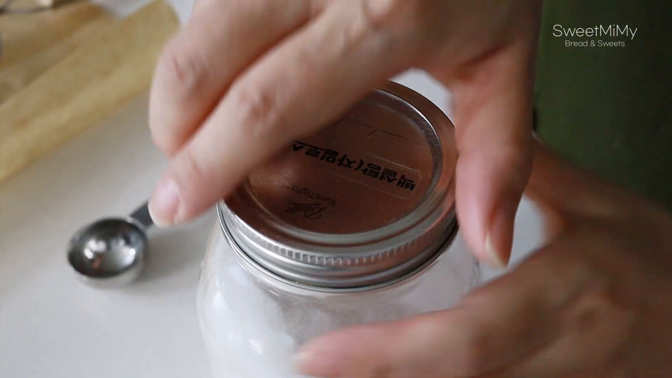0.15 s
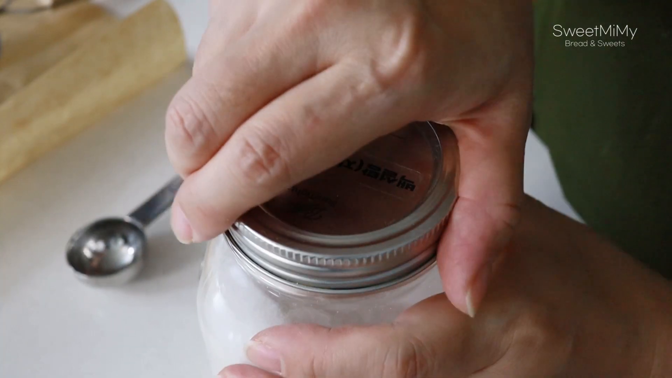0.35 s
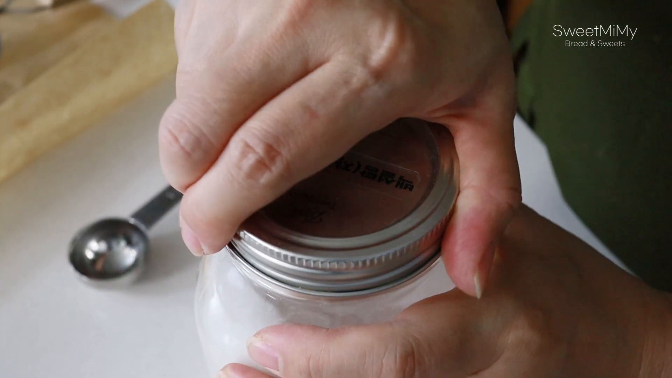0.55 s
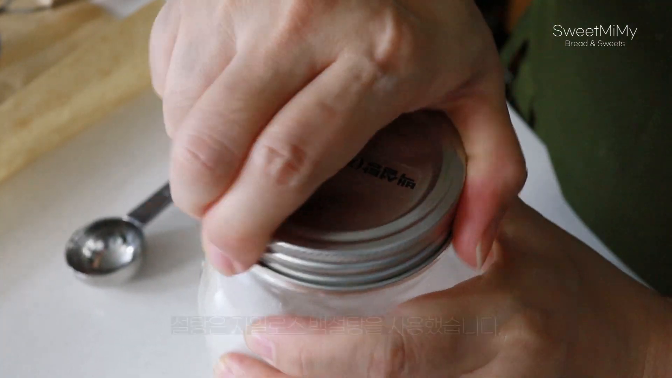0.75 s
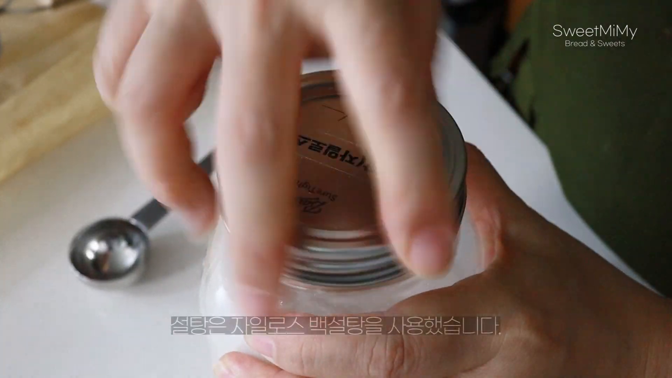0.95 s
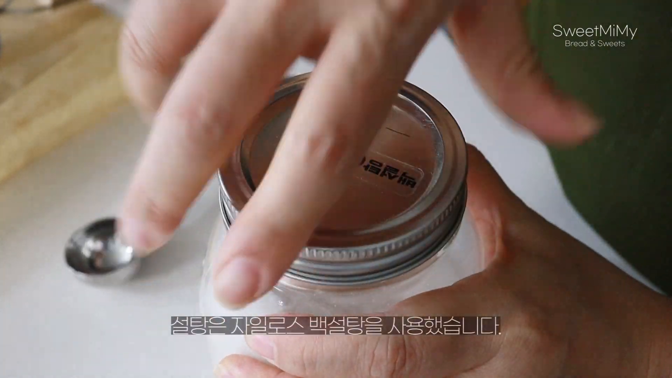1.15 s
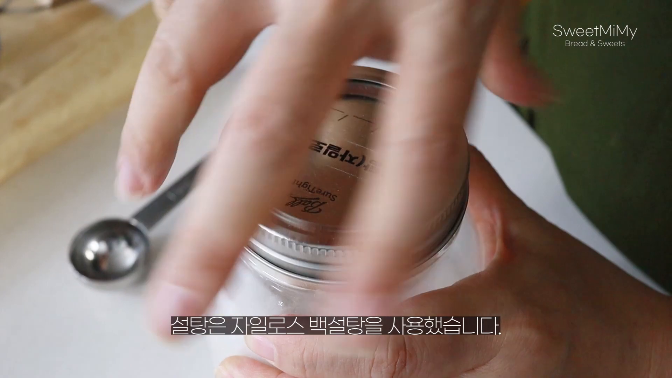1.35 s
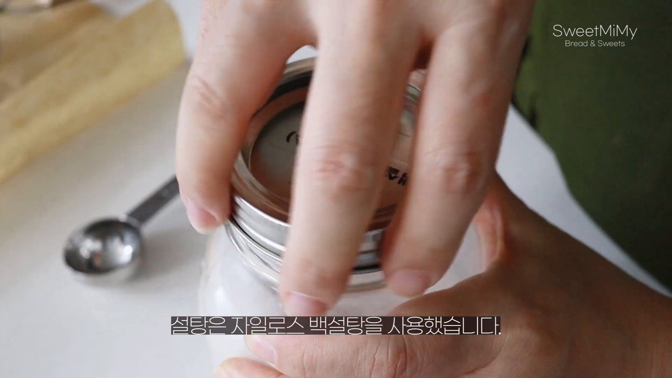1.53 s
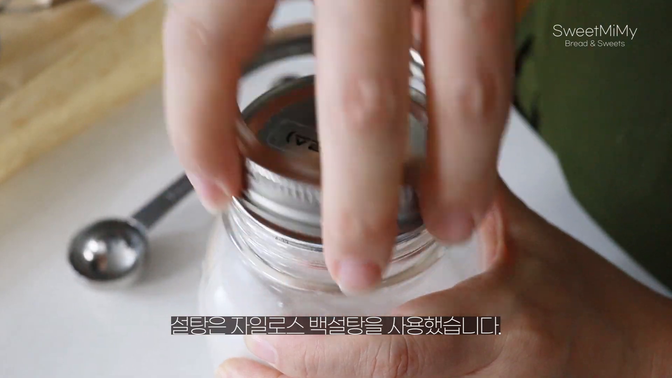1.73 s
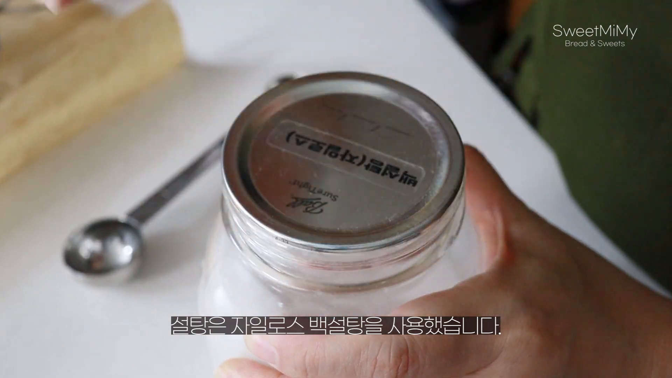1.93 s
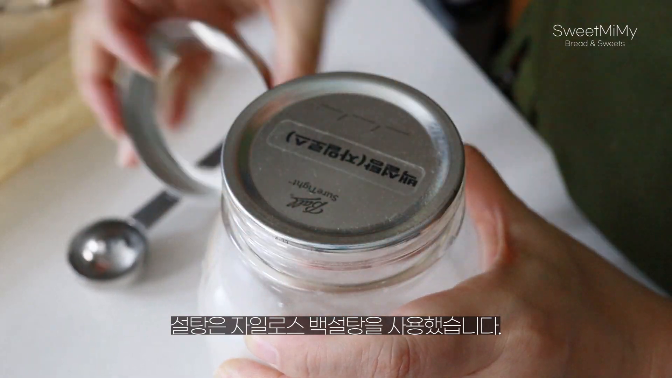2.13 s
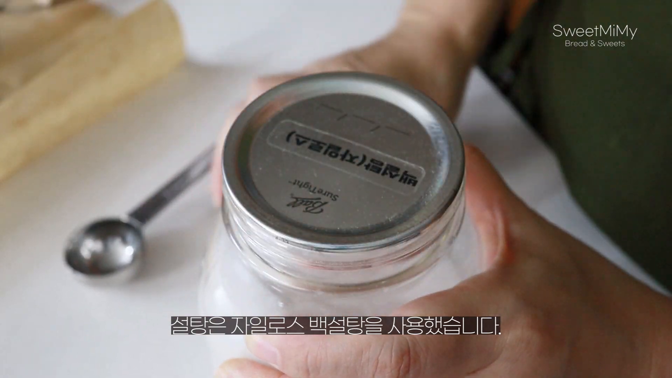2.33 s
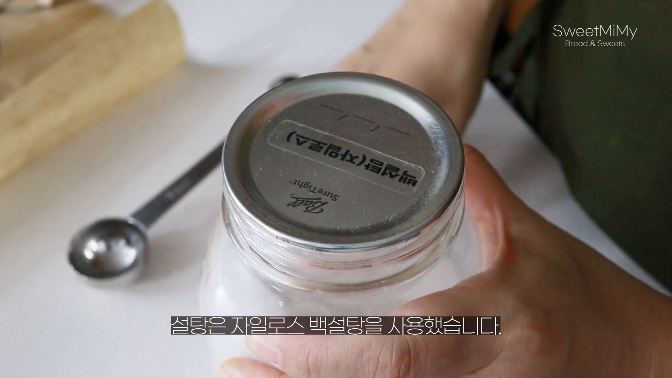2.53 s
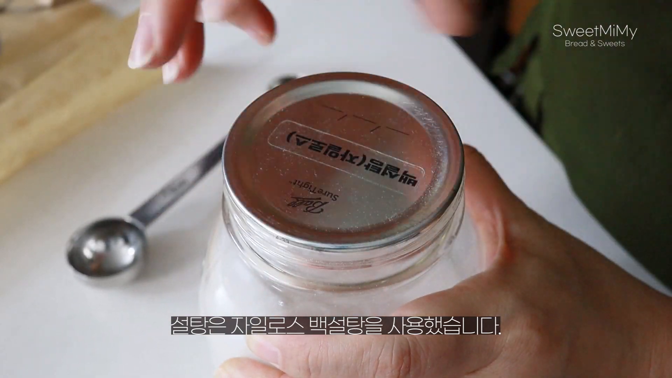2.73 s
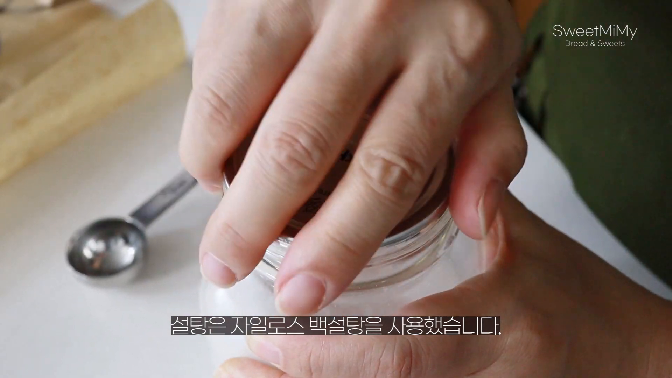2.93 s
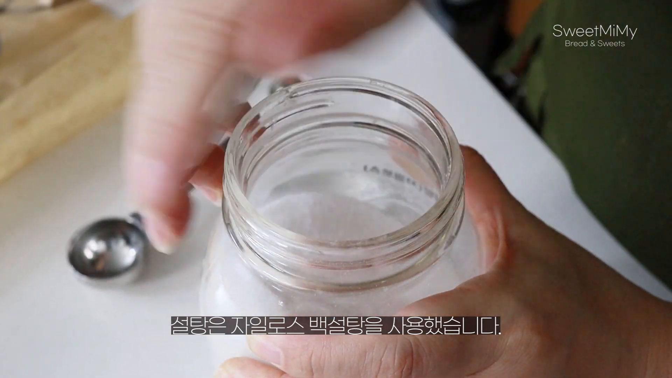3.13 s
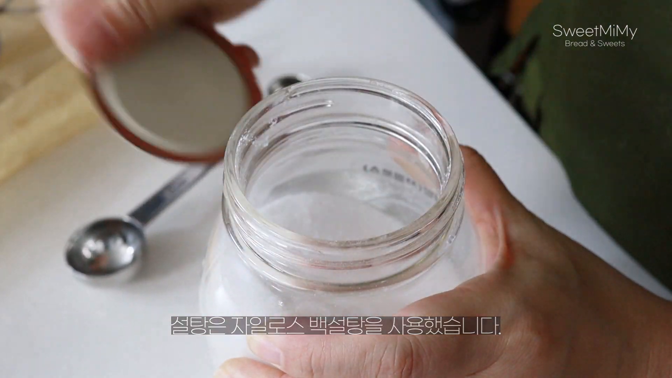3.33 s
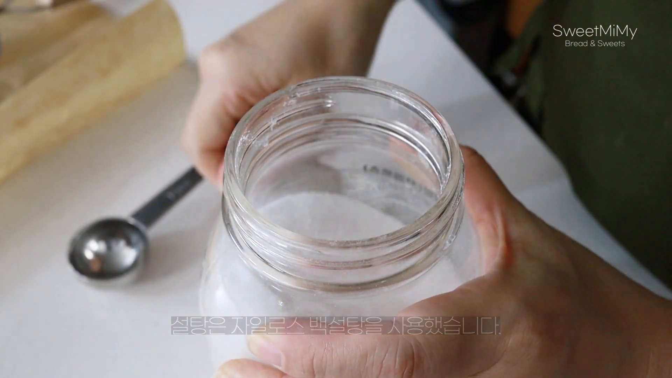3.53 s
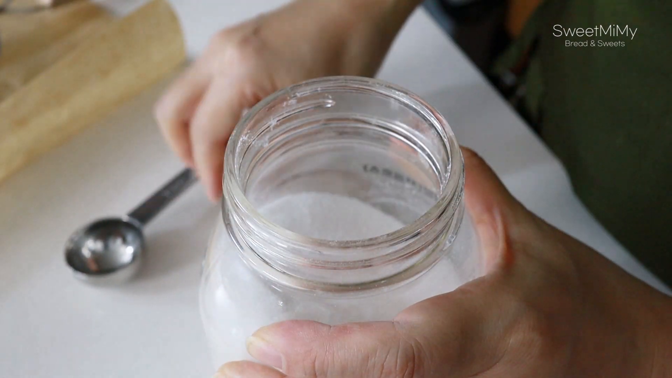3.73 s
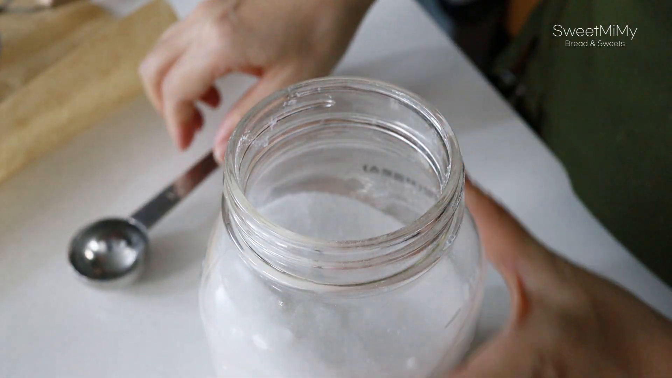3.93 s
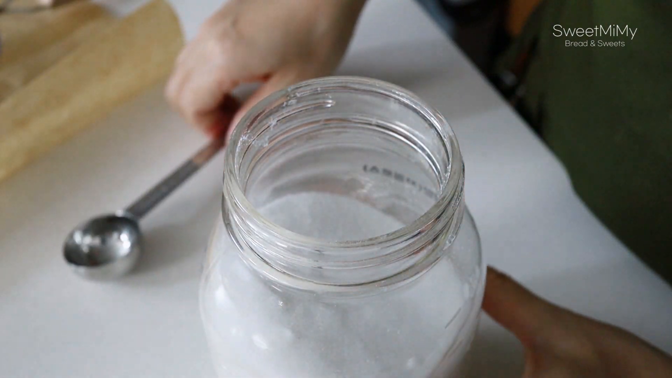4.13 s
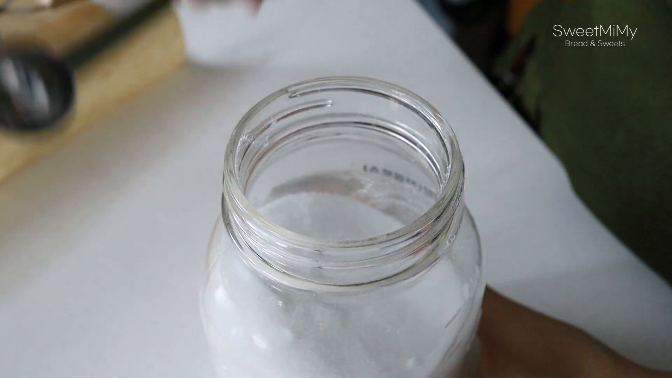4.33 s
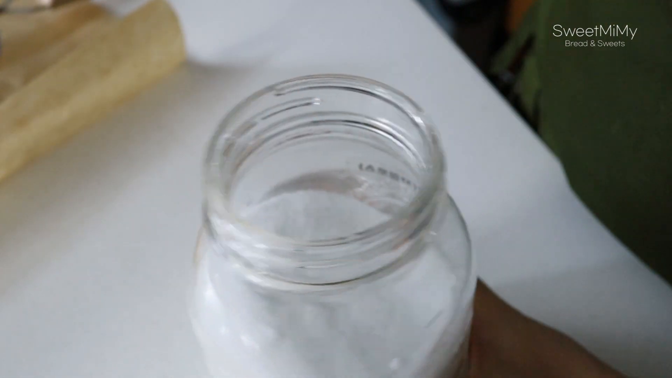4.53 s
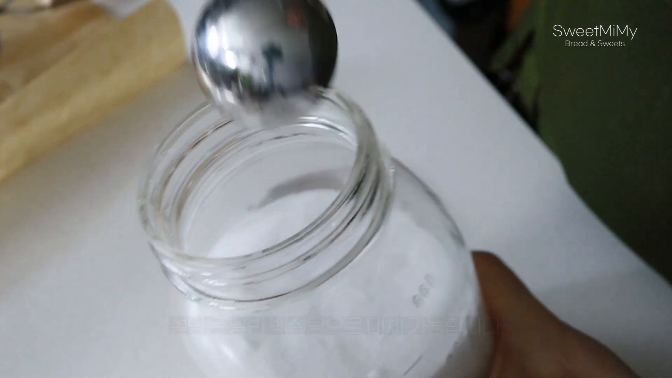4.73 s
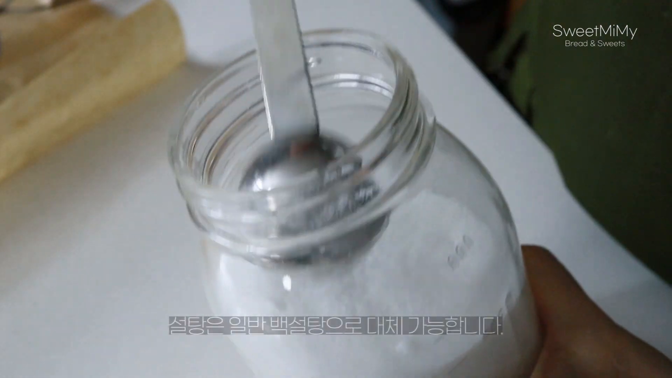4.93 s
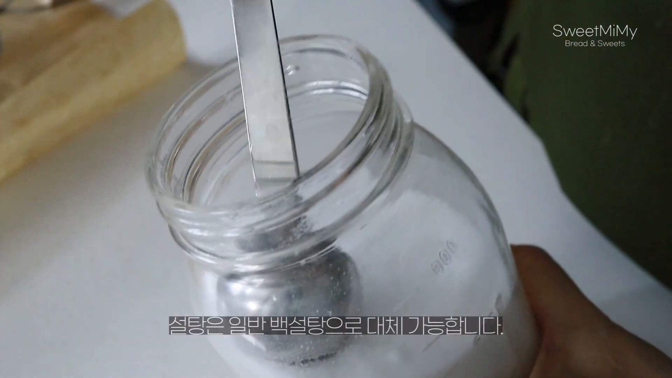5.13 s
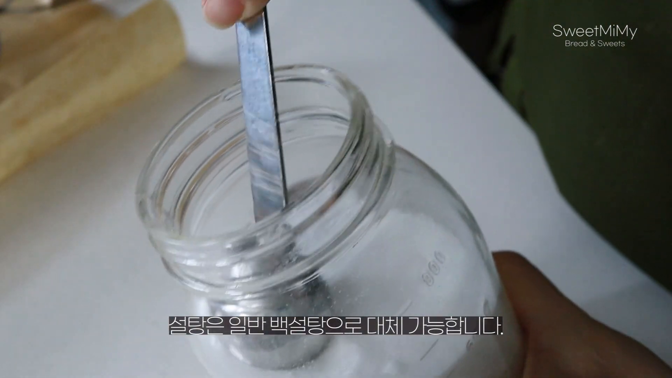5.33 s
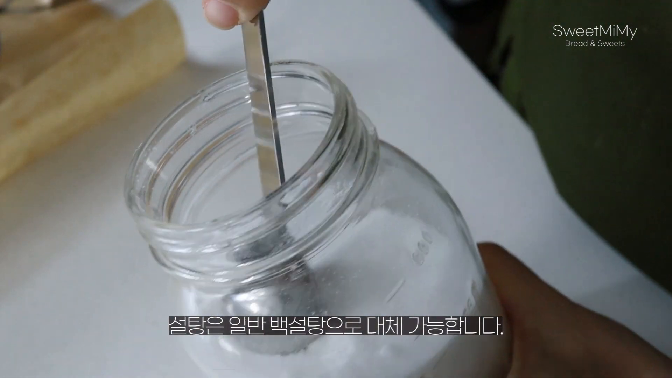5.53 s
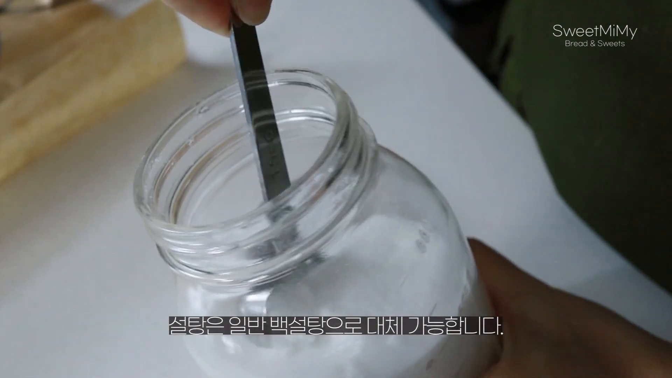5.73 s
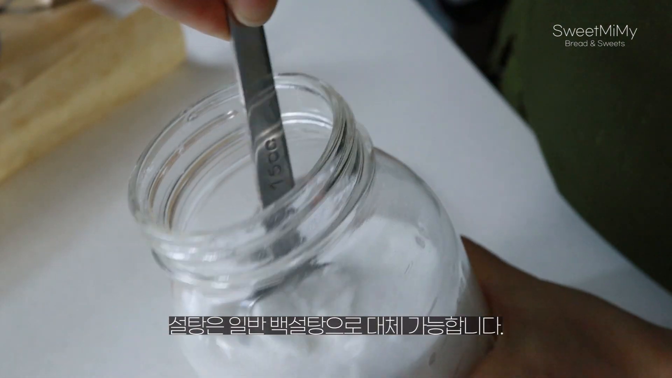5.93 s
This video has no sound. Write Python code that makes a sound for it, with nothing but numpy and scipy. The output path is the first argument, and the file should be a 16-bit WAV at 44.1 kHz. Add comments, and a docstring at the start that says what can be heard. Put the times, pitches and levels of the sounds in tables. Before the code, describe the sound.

A metal screw band scrapes and catches off a glass jar, rattles onto the table, the lid clatters after, then a spoon clinks and crunches into sugar.

```python
"""A hand grips a glass jar and twists off its metal screw band: pings, scraping and hollow grinding from noise.
The band drops on the table and rattles to rest; then the flat lid comes off and clatters down in the same way.
A steel spoon slides and chatters off the table, and the jar is dragged: ringing modes and grains of friction.
Last, the spoon clinks on the glass, digs crunching into sugar that also squeaks, and knocks on the damped glass.
All is close by in a small kitchen with faint air noise, and the hardest blows overload the microphone."""
import sys
import numpy as np
from scipy import signal
from scipy.fft import rfft, irfft
from scipy.io import wavfile
from scipy.ndimage import uniform_filter1d

SR = 44100
rng = np.random.default_rng(int(sys.argv[2]) if len(sys.argv) > 2 else 0)


def file_out(sig):
    """Save sig as 16-bit WAV at sys.argv[1]."""
    # one column per channel
    cols = np.atleast_2d(sig).T
    # limit, then scale
    lim = np.clip(cols, -1, 1)
    pcm = np.round(lim * 32767).astype(np.int16)
    wavfile.write(sys.argv[1], SR, pcm)


N = 267898
TIME = np.arange(N) / SR

# All levels are relative: each source also has mixing gains of its own.
# Strokes of the hand swell to a peak and die away; rise and fall each span 20 dB.
# Turns of the band on the thread:
# (peak time [s], rise [s], fall [s], scrape level [dB], hollow grinding level [dB])
TURNS = [(0.83, 0.011, 0.08, -22.5, -24.5), (0.97, 0.15, 0.099, -33, -38),
         (1.052, 0.046, 0.04, -14.5, -35.5), (1.11, 0.042, 0.082, -22.5, -20),
         (1.366, 0.04, 0.047, -11.5, -29.5), (1.44, 0.023, 0.024, -18, -56),
         (1.6, 0.062, 0.054, -28, -36.5), (1.77, 0.033, 0.043, -49.5, -44.5)]
# Pushes of the spoon into the sugar:
# (peak time [s], rise [s], fall [s], crunch level [dB], fizz of cracking crystals [dB])
DIGS = [(5.08, 0.031, 0.18, -31, -73), (5.27, 0.089, 0.1, -33, -47), (5.335, 0.046, 0.037, -27, -35.5),
        (5.42, 0.055, 0.36, -28, -40), (5.597, 0.028, 0.083, -19, -30), (5.69, 0.1, 0.21, -23, -36.5),
        (6.068, 0.021, 0.14, -28, -28)]
# The lid slipping over the rim of the jar: (peak time [s], rise [s], fall [s], rub level [dB], fizz level [dB])
LID_SLIDES = [(2.99, 0.025, 0.041, -38.5, -63.5), (3.272, 0.032, 0.056, -28.5, -45),
              (3.39, 0.24, 0.12, -43.5, -45)]
# Squeals, slides, scuffs, drags, squeaks and grips: (peak time [s], rise [s], fall [s], level [dB])
THREAD_SQUEALS = [(1.33, 0.016, 0.027, -13)]
BAND_SLIDES = [(2.43, 0.028, 0.14, -26.5)]
LID_SCUFFS = [(3.13, 0.034, 0.06, -42), (3.22, 0.035, 0.056, -33.5)]
SPOON_SLIDES = [(4.232, 0.029, 0.096, -34.5)]
JAR_DRAGS = [(4.5, 0.031, 0.086, -37.5), (4.68, 0.06, 0.073, -20)]
SQUEAKS = [(5.804, 0.043, 0.041, -17), (5.95, 0.025, 0.074, -33)]
GRIPS = [(0.53, 0.044, 0.13, -21.5), (0.85, 0.062, 0.11, -19.5), (1.72, 0.099, 0.11, -29.5),
         (3.03, 0.089, 0.3, -35), (5.95, 0.18, 0.2, -24.5)]
# The sliding spoon falls in pitch: (time [s], pitch [Hz])
SPOON_GLIDE = [(4.21, 1630), (4.24, 1080)]
# Wobble of a dropped disc as it settles: (time [s], level [dB])
BAND_WOBBLE = [(2.625, -23.5), (2.721, -18.5), (2.832, -31.5), (2.863, -72)]
LID_WOBBLE = [(3.684, -15.5), (3.749, -17), (3.88, -24), (3.913, -13.5), (4.0, -25.5), (4.1, -51.5)]
# Single blows: (time [s], level [dB])
THREAD_CATCHES = [(0.647, -36.5), (0.769, -38), (0.811, -19.5), (1.025, -6.5), (1.061, 3), (1.096, -3.5),
                  (1.306, -22), (1.372, 1.5), (1.416, -6.5), (1.426, -1), (1.598, -11.5)]
BAND_PINGS = [(0.677, -25.5), (0.696, -21)]
BAND_LANDING = [(2.4054, 6), (2.526, -22.5), (2.597, -27)]
BAND_BOUNCES = [(2.62, 0), (2.634, 0), (2.657, -5), (2.685, -2.5), (2.704, -13.5)]
LID_RELEASE = [(3.2048, -0.91)]
SPOON_TAPS = [(4.245, -17), (4.276, -14), (4.284, -10), (4.298, -15)]
SPOON_CLINK = [(5.0543, 11.5)]
SPOON_KNOCKS = [(5.449, 0.5), (5.8293, 1.5), (5.9035, -8.5)]
# The lid lands on a different part of its rim each time: (time [s], level [dB], pitch of the clack [Hz])
LID_BOUNCES = [(3.68, -4, 2450), (3.703, -6.5, 3410), (3.737, -3.5, 2310), (3.815, -3.5, 3900),
               (3.844, -8, 1870), (3.875, -7.5, 1710), (3.897, -16.5, 3350)]
# Dull bumps of hands and jar, carried by the table: (time [s], level [dB], pitch [Hz])
BUMPS = [(0.514, -15, 165), (0.855, -11, 156), (1.061, -2.5, 503), (1.097, -10, 505), (1.303, -19.5, 347),
         (1.367, -10.5, 313), (1.635, -23, 328.4), (2.986, -29.5, 313), (3.113, -33, 395),
         (3.205, -24.5, 187), (5.8283, -1, 220), (5.88, -10, 153)]

# Modes (natural ringing tones) of the loose metal parts: (pitch [Hz], level [dB])
BAND_MODES = [(587, -11), (2433, -10), (3682, -3), (3924, -3), (4980, -6), (7294, -5), (8802, -5),
              (9927, -6), (10105, -5), (10702, -8), (11371, -2)]
LID_MODES = [(956, -1.5), (3368, -1), (3672, -6), (5604, -7), (6226, -6), (9450, -9), (10050, -4),
             (11320, -11)]
# The one tone of each disc that rings on once it rolls:
# (pitch [Hz], level [dB], time to fall 60 dB [s], start of rolling [s])
BAND_RIM = (3327, -22, .3, 2.68)
LID_RIM = (1812, -14, .33, 3.84)
# Modes of held or damped things: (pitch [Hz], level [dB], time to fall 60 dB [s])
BAND_ON_JAR = [(781, -11, .2), (3321, -1, .08), (3770, -2, .09), (4800, -5, .06)]
BAND_HELD = [(1134, 1.1, 0.12), (3740, 5.7, 0.12), (5130, 2, 0.0085)]
LID_HELD = [(660, 13.4, 0.044), (2066, 3.7, 0.028), (5090, 17.8, 0.013)]
# The bowl of the spoon has a close pair of modes that beat slowly.
SPOON_MODES = [(1082, 11, .037), (2385, -29, .7), (3320, 6, .025), (2387.5, -29, .7), (4085, -20, .3)]
GLASS_MODES = [(2385, -42, .35), (3079, -26, .15), (3110, 0, .026), (5400, -7, .022)]
GLASS_IN_SUGAR = [(716, -4.5, 0.039), (1078, -6, 0.036), (2040, 16, 0.0028)]
# Broad resonances under rubbing: (pitch [Hz], width [Hz], level [dB])
THREAD_PEAKS = [(3460, 520, 4.5), (5510, 310, 9.5)]
SQUEAL_PEAK = [(3147, 600, 0)]
JAR_AIR = [(350, 170, 0), (570, 240, 1.5), (850, 220, 1)]
JAR_SHUT = [(1080, 150, 0)]
LID_PEAKS = [(5250, 320, 0.0016), (5760, 700, 0.0037)]
SUGAR_PEAKS = [(1140, 61, -6), (3410, 200, 5)]
TABLE_PEAKS = [(212, 53, -0.5), (790, 4800, 6)]
# Colours of noise, points along a spectrum: (frequency [Hz], level [dB])
THREAD_NOISE = [(300, -7), (1450, -13.5), (2900, 2), (5800, 0.5), (7500, -10), (11000, -7.5),
                (15900, -21.5)]
BAND_NOISE = [(1100, -11), (1800, -25), (2600, -4), (4000, -3), (7800, -10.5), (10000, 0.5), (15900, -8.5)]
LID_NOISE = [(500, -13.5), (1000, -5.5), (3300, 7), (6200, 4), (7800, -8), (11500, -1), (15900, -13.5)]
TABLE_NOISE = [(200, -14), (1000, -6.5), (3700, 14), (6800, -0.5), (15900, -14)]
SUGAR_NOISE = [(350, -26), (700, -12), (2000, -13), (5600, 0), (7400, -12), (12000, -15), (15900, -27)]
SPOON_NOISE = [(200, -56.5), (1000, 15.5), (3800, 13.5), (5500, -11), (15000, -33)]
RUMBLE = [(15, -12.5), (35, 16.5), (60, -13.5), (200, -10), (1500, -59.5)]
ROOM_AIR = [(250, -4), (1100, -14), (1600, -21.5), (5500, -22.5), (9000, -33)]

BAND_FREE_S, TIGHT_FIZZ_DB = 1.0, -15.5  # until it comes free, the tight band scrapes with less fizz
RING_ONSET_S = 0.0038  # time for a mode to build up to 99.9 %
CONTACT_S = 0.035  # how long one place on a rim stays in contact
MODE_SPACING_HZ = 110  # mean gap between the weak modes of thin steel
EDGE_HZ = 15850  # top of the frequency range


def unscrewing():
    """The band pings under the grip, then grinds and catches along the glass thread."""
    pings = strike(BAND_PINGS, BAND_ON_JAR, THREAD_NOISE, ring_db=-3.0, crack_db=-9)
    scraping, grinding = strokes(TURNS)
    tight = TIME < BAND_FREE_S
    body, fizz = split(rub(THREAD_NOISE, THREAD_PEAKS, clump_db=2.5, peaks_db=-3.5))
    fizz_gain = amp(np.where(tight, TIGHT_FIZZ_DB, 1.5))
    scrape = scraping * (body + fizz * fizz_gain)
    scrape += strike(THREAD_CATCHES, BAND_HELD, THREAD_NOISE, ring_db=-14.0, crack_db=-3.0, crack_t60=0.0076)
    # the jar sounds shut at first, then wavers through the broader resonances of its air
    grit = grains(per_s=900, spread_db=2.0)
    shut = resonate(grit, JAR_SHUT)
    loose = resonate(resonate(grit, JAR_AIR), JAR_AIR, waver_db=2.0)
    hollow = grinding * np.where(tight, evened(shut), evened(loose))
    squeal_tone = resonate(resonate(rng.standard_normal(N), SQUEAL_PEAK), SQUEAL_PEAK)
    squeal = strokes(THREAD_SQUEALS) * evened(squeal_tone)
    return pings + squeal + hollow + amp(-3) * scrape + amp(-4.5) * overtones(scrape, t60=.04)


def screw_band():
    """The band lands on the table still held, slides, then is let go and rattles to rest."""
    out = strike(BAND_LANDING, BAND_HELD, TABLE_NOISE, ring_db=-17.5, crack_db=-1.5, tail_db=-32.0)
    out += strokes(BAND_SLIDES) * rub(TABLE_NOISE, THREAD_PEAKS, clump_db=0.5, peaks_db=-7)
    return out + rattle(BAND_BOUNCES, BAND_WOBBLE, BAND_MODES, BAND_RIM, BAND_NOISE,
                        direct_db=-5.5, haze_db=-3, ring_db=-9, t60=.13)


def flat_lid():
    """The lid slips a little, scuffs, comes unstuck, slips over the jar's rim and clatters on the table."""
    out = strike(LID_RELEASE, LID_HELD, BAND_NOISE, ring_db=-4.0, crack_db=-18.5)
    scuff_peaks = [(hz, 300, 0) for hz, _, _ in LID_HELD[:2]]  # scuffed under the fingers
    out += strokes(LID_SCUFFS) * rub(LID_NOISE, scuff_peaks, clump_db=0.5, peaks_db=11.0)
    slipping, fizzing = strokes(LID_SLIDES)
    body, fizz = split(rub(SUGAR_NOISE, LID_PEAKS, clump_db=2.0, peaks_db=5.0))
    out += slipping * body + fizzing * evened(fizz)
    for s, db, hz in LID_BOUNCES:
        clack = ring([(hz, 0, .02), (hz * 1.08, 0, .02), (1300, -2, .02)])
        add(out, s, amp(db + 3) * clack)
    return out + rattle(LID_BOUNCES, LID_WOBBLE, LID_MODES, LID_RIM, LID_NOISE,
                        direct_db=-2.5, haze_db=-5, ring_db=-7, t60=0.12)


def spoon():
    """The spoon slides and chatters off the table, clinks on the neck, then knocks on glass damped by sugar."""
    out = strike(SPOON_TAPS, SPOON_MODES, SPOON_NOISE, ring_db=3.5, crack_db=-1.5)
    glide_hz = np.interp(TIME, *np.transpose(SPOON_GLIDE))
    out += strokes(SPOON_SLIDES) * rub(SPOON_NOISE, [(glide_hz, 150, 0)], clump_db=2, peaks_db=6)
    out += strike(SPOON_CLINK, GLASS_MODES, TABLE_NOISE, ring_db=-3.0, crack_db=-8.5,
                  crack_t60=0.0094, tail_db=-56)
    return out + strike(SPOON_KNOCKS, GLASS_IN_SUGAR, TABLE_NOISE, ring_db=7.5, crack_db=-17.5)


def sugar():
    """Crystals crunch past the spoon; packed tight, they squeak at the pitch of the air in the jar."""
    crunching, cracking = strokes(DIGS, roundness=0.67)
    body, fizz = split(rub(SUGAR_NOISE, SUGAR_PEAKS, clump_db=2.2, peaks_db=-6))
    cavity = [(1074, 290, 0)]
    squeak_tone = resonate(resonate(rng.standard_normal(N), cavity), cavity)
    squeak = strokes(SQUEAKS, roundness=3) * evened(squeak_tone)
    return crunching * body + cracking * evened(fizz) + squeak


def handling():
    """Hands rumble and bump on the jar, and its foot judders across the table."""
    out = strokes(GRIPS) * evened(colour(rng.standard_normal(N), RUMBLE))
    for s, db, hz in BUMPS:
        t60 = 11 / hz  # a bump falls 60 dB within 11 cycles
        spectrum = [(hz / 10, -18), (hz, 0), (hz * 2, -4), (hz * 20, -65)]
        shudder = colour(rng.standard_normal(SR) * dying(t60), spectrum)
        add(out, s, amp(db) * (ring([(hz, 0, t60)]) + amp(-3.5) * shudder))
    judder = resonate(grains(per_s=1100, spread_db=-4.5), TABLE_PEAKS)
    return out + strokes(JAR_DRAGS) * evened(colour(judder, [(70, -34), (170, 8.0), (9000, -27)]))


def kitchen(x, wet_db, t60):
    """Reflections from cupboards and walls add a short tail of dying noise."""
    reflections = rng.standard_normal(SR) * dying(t60) * (TIME[:SR] > .004)
    return x + amp(wet_db) * through(x, reflections)


def room_air():
    """Steady, faint noise of the air in the room."""
    return amp(-60.5) * evened(colour(rng.standard_normal(N), ROOM_AIR))


def rattle(bounces, settling, modes, rim, noise, direct_db, haze_db, ring_db, t60):
    """A dropped disc bounces, then its rim hits the table ever faster and keeps it ringing."""
    hits_per_s = np.interp(TIME, [settling[0][0], settling[-1][0]], [60, 170])
    since_hit = np.cumsum(hits_per_s * unsteady(4, size=800)) / SR % 1  # as a fraction of the gap between hits
    pressure = follow(settling) * evened(np.exp(-since_hit / .5))
    for s, db, *_ in bounces:
        add(pressure, s, amp(db) * dying(0.014))
    force = pressure * rng.standard_normal(N)
    contact = colour(force, noise)
    haze = overtones(contact, t60=0.08)
    tones = roving(force, lambda: ring([(hz, db, t60) for hz, db in modes], spread_db=4))
    rim_hz, rim_db, rim_t60, rolling_s = rim
    rim_tone = amp(rim_db) * through(force * (TIME > rolling_s), ring([(rim_hz, 0, rim_t60)]))
    return amp(direct_db) * contact + amp(haze_db) * haze + amp(ring_db) * tones + rim_tone


def strike(rows, modes, noise, ring_db, crack_db, crack_t60=.018, tail_db=-20, tail_t60=.14):
    """Each blow is a short crack with a faint tail, and the ringing of the main modes."""
    out = np.zeros(N)
    for s, db in rows:
        burst = rng.standard_normal(SR) * (dying(crack_t60) + amp(tail_db) * dying(tail_t60))
        crack = amp(crack_db) * colour(burst, noise)
        ringing = amp(ring_db) * ring(modes, spread_db=1)
        add(out, s, amp(db) * (crack + ringing))
    return out


def rub(noise, peaks, clump_db, peaks_db):
    """Clumps of friction grains, heard directly and through the wavering resonances of the rubbed thing."""
    force = grains(per_s=11000, spread_db=3) * unsteady(clump_db, size=500)
    direct = evened(colour(force, noise))
    resonant = evened(resonate(force, peaks, waver_db=.13))
    return evened(direct + amp(peaks_db) * resonant)


def grains(per_s, spread_db):
    """Tiny random collisions of uneven size: a positive spread makes a few large, a negative one a few small."""
    size = amp(spread_db * np.minimum(rng.exponential(1, N), 3))
    return evened(size * rng.choice([-1, 1], N) * (rng.random(N) < per_s / SR))


def ring(modes, spread_db=0):
    """Free ringing of an object: dying sines, their weights varied at random with the place of the blow."""
    t = TIME[:SR]
    weights = amp([db for _, db, _ in modes] + spread_db * rng.standard_normal(len(modes)))
    # every second mode starts the opposite way
    waves = [np.sin(2 * np.pi * hz * t) * dying(t60) * (-1) ** k for k, (hz, _, t60) in enumerate(modes)]
    return weights @ waves / np.linalg.norm(weights) * (1 - dying(RING_ONSET_S))


def overtones(x, t60):
    """Thin steel rings with a thicket of weak modes."""
    present = rng.random(SR // 2 + 1) < 1 / MODE_SPACING_HZ  # one chance for each 1 Hz step
    return roving(x, lambda: irfft(present * rfft(rng.standard_normal(SR))) * dying(t60))


def roving(x, response, count=4):
    """The point of contact moves round the rim, and each place rings with its own mix of modes."""
    place = TIME // CONTACT_S % count
    return sum(through(x * (place == k), response()) for k in range(count))


def resonate(x, peaks, waver_db=0):
    """Passes a force through broad resonances, whose pitch may follow a curve or waver."""
    out = 0
    for hz, width, db in peaks:
        drift = unsteady(waver_db, size=2500) if waver_db else np.ones(N)
        # shift the moving pitch down to zero, filter there, then shift back up
        turn = np.exp(2j * np.pi * np.cumsum(hz * drift) / SR)
        response = dying(np.log(1000) / np.pi / width) * (1 - dying(RING_ONSET_S))
        out = out + amp(db) * (turn * through(x / turn, response)).imag
    return out


def strokes(rows, roundness=1.4):
    """Gain of a series of strokes that swell and die away; one curve for each level column."""
    power = 0
    for peak, rise, fall, *levels in rows:
        away = np.maximum((peak - TIME) / rise, (TIME - peak) / fall)
        shape = amp(-20 * np.minimum(away, 10) ** roundness)
        power = power + np.outer(amp(levels), shape) ** 2
    return np.squeeze(np.sqrt(power))


def follow(rows):
    """Gain along a level curve, silent outside it, with its edges smoothed."""
    s, db = np.transpose(rows)
    inside = (TIME >= s[0]) * (TIME <= s[-1])
    return uniform_filter1d(amp(np.interp(TIME, s, db)) * inside, size=200)


def unsteady(depth_db, size):
    """A gain that wanders at random, changing over about size samples."""
    return amp(depth_db * evened(through(rng.standard_normal(N), np.hanning(size))))


def split(x):
    """Parts a friction sound at 6900 Hz into its body and its fizz."""
    return [signal.sosfilt(signal.butter(5, 6900, side, fs=SR, output="sos"), x) for side in ("low", "high")]


def colour(x, points):
    """Filters a sound to the given spectrum, without any sound ahead of its cause."""
    hz, db = np.transpose(points)
    bins = abs(np.fft.fftfreq(4096, 1 / SR))
    log_gain = np.log(amp(np.interp(np.log(bins + 1), np.log(hz + 1), db)))
    # the Hilbert transform of the log gain gives the phase of a minimum-phase filter
    return through(x, np.fft.ifft(np.exp(np.conj(signal.hilbert(log_gain)))).real)


def through(x, response):
    """Convolves with a response scaled to unit energy."""
    return signal.fftconvolve(x, response / np.linalg.norm(response))[:len(x)]


def dying(t60):
    """One second of exponential decay that falls 60 dB in t60 seconds."""
    return np.exp(-np.log(1000) * TIME[:SR] / t60)


def add(mix, s, sound):
    """Mixes a sound in at a time in seconds."""
    part = mix[round(s * SR):][:len(sound)]
    part += sound[:len(part)]


def evened(x):
    """Scales to an rms (average strength) of one."""
    return x / np.sqrt(np.mean(x ** 2) + 1e-20)


def amp(db):
    """Decibels to gain."""
    return 10 ** (np.asarray(db) / 20)


def scene():
    """All sources in the room, over faint air noise."""
    things = unscrewing() + screw_band() + flat_lid() + spoon() + sugar() + handling()
    return (kitchen(things, wet_db=-13, t60=0.12) + room_air())[None]


def record(dry):
    """Hard overload flattens the loudest blows, then a low-pass filter limits the treble."""
    clipped = np.clip(dry, -1, 1)
    low_pass = signal.firwin(511, EDGE_HZ, window=("kaiser", 8), fs=SR)
    return signal.oaconvolve(clipped, low_pass[None], "same")


dry = scene()
out = record(dry)
file_out(out)
```